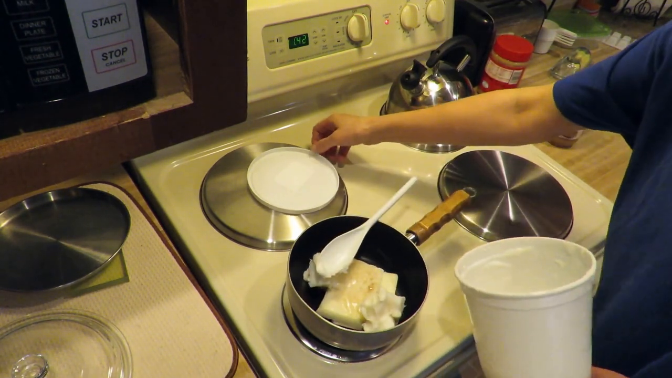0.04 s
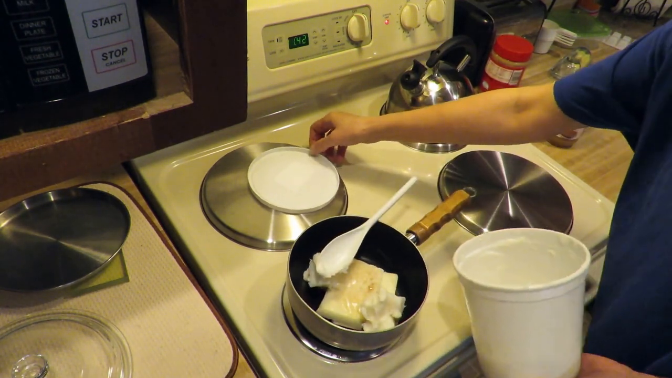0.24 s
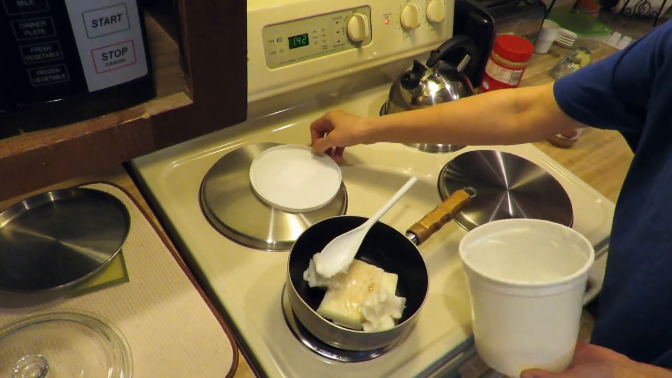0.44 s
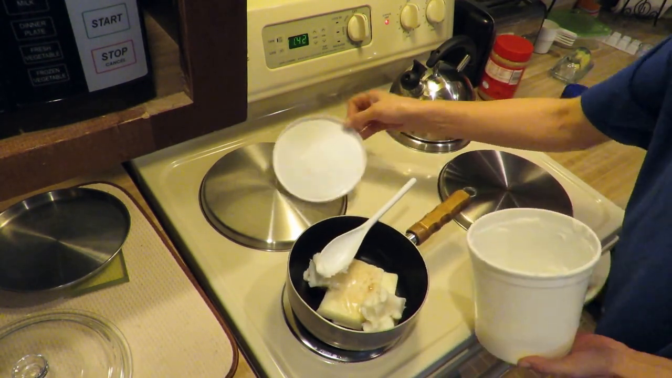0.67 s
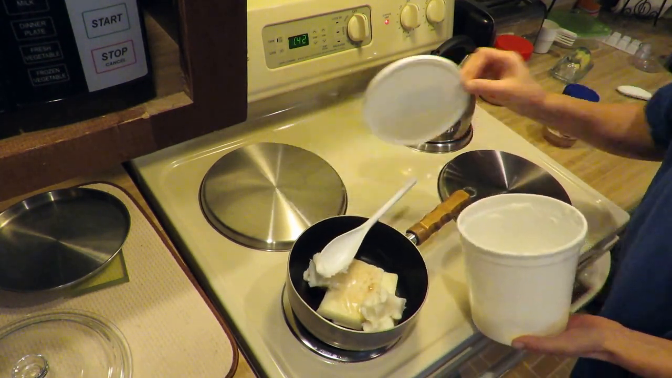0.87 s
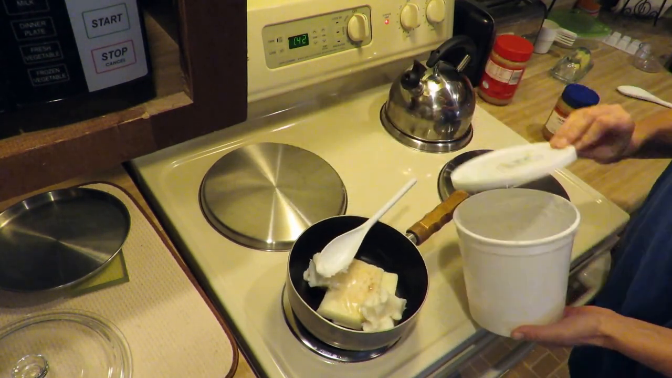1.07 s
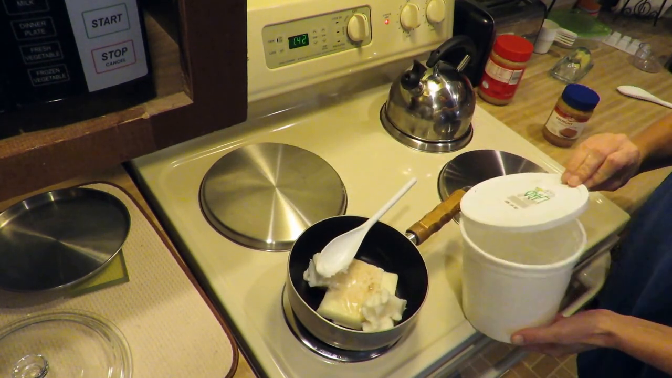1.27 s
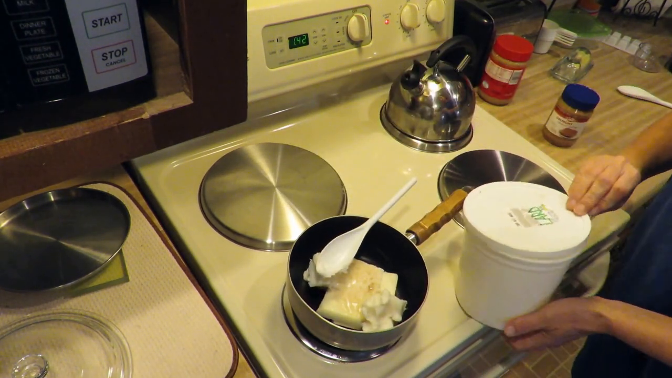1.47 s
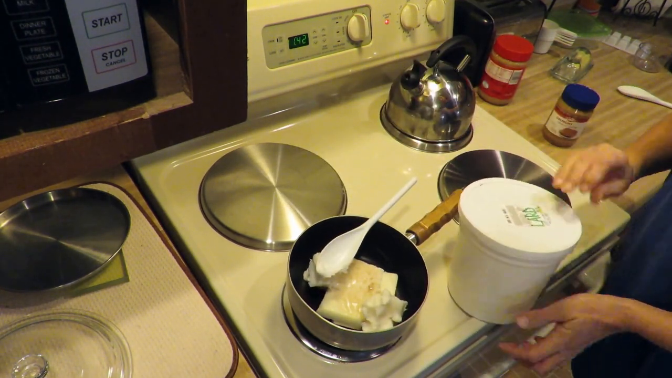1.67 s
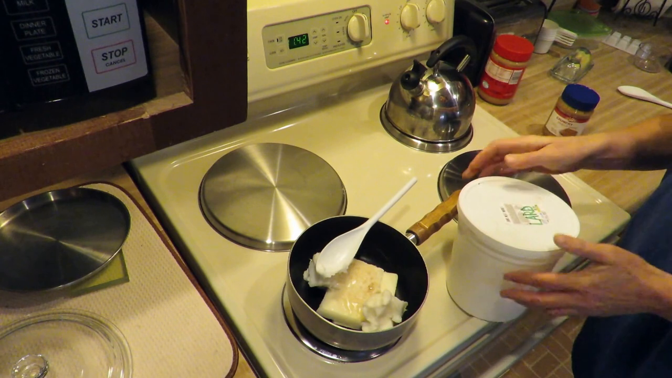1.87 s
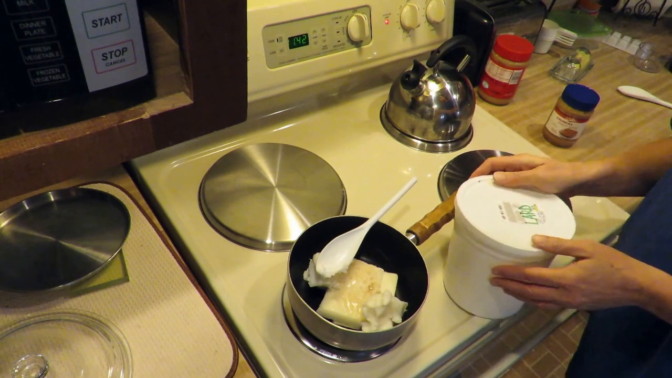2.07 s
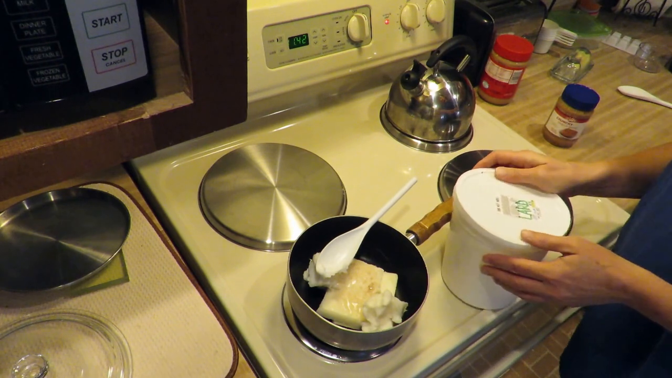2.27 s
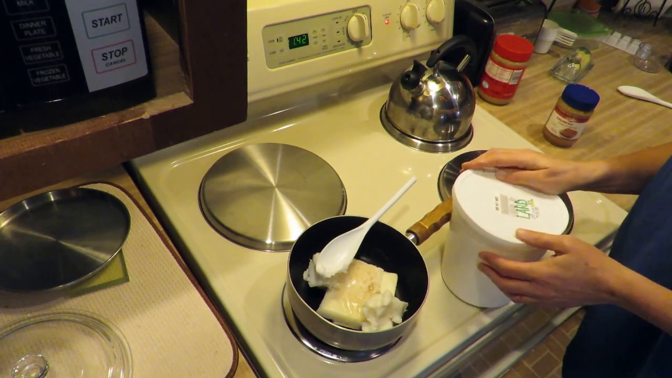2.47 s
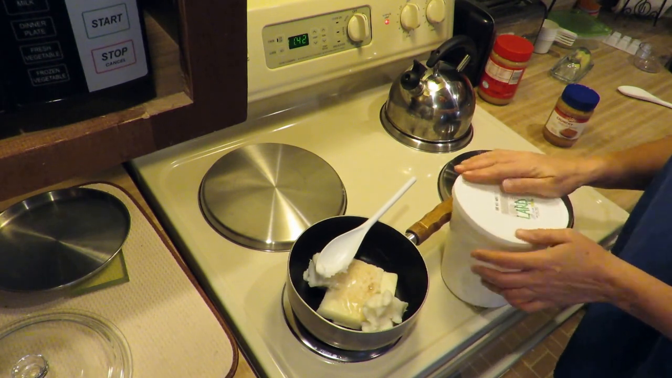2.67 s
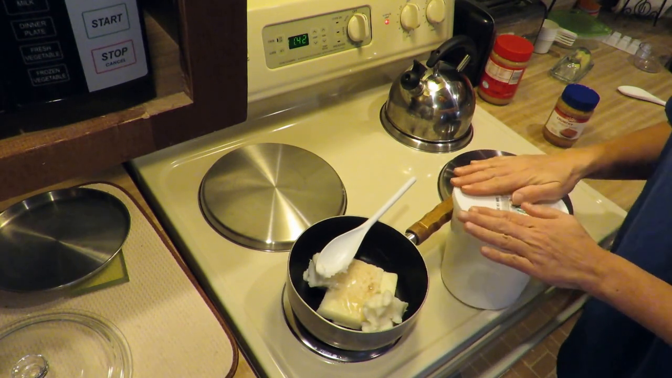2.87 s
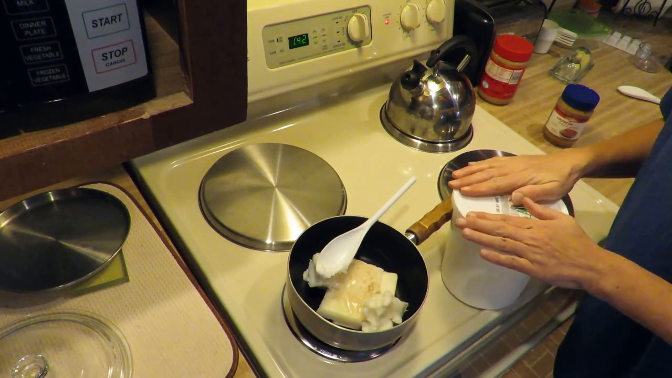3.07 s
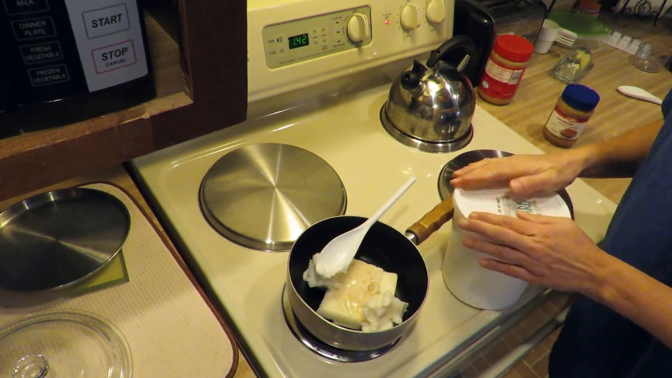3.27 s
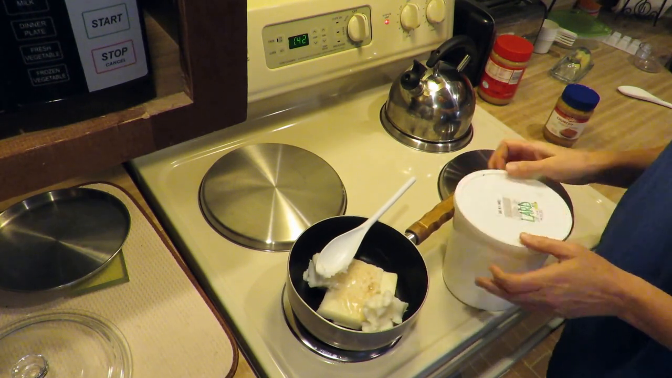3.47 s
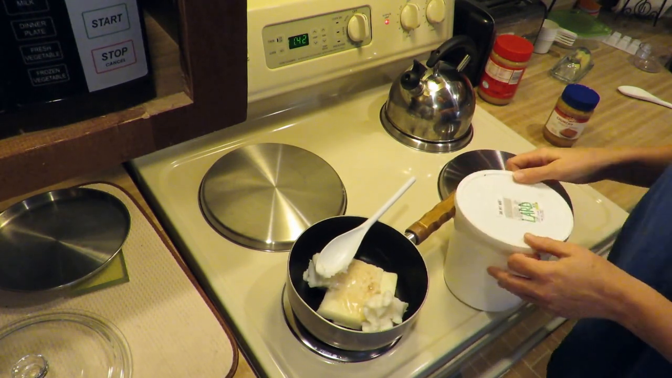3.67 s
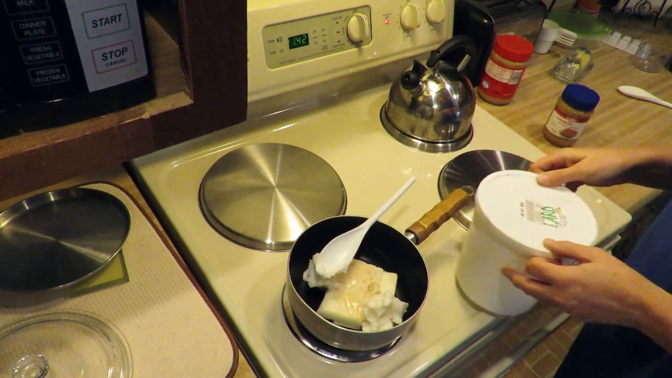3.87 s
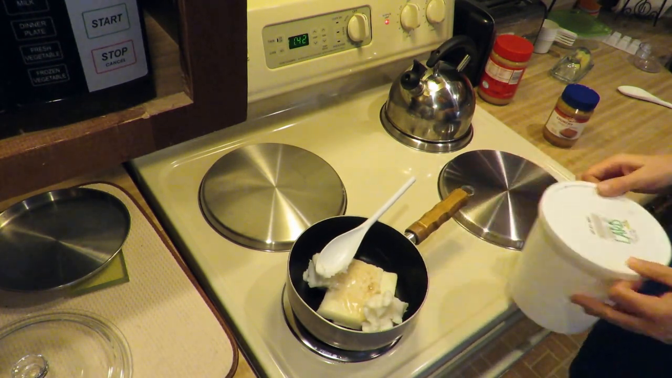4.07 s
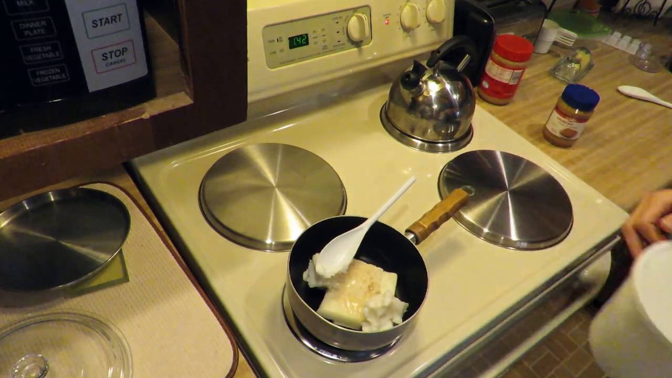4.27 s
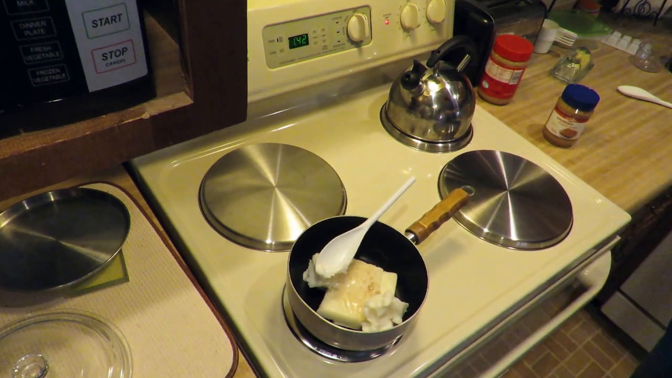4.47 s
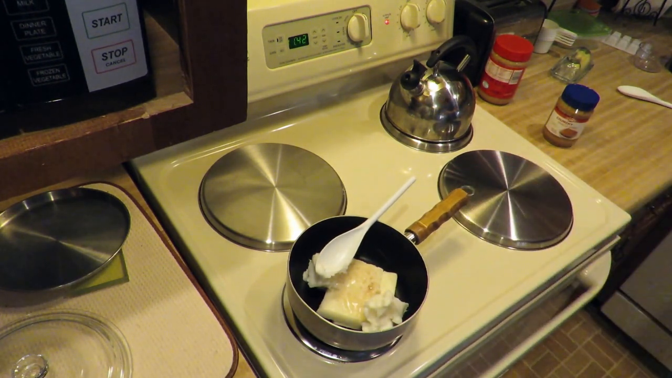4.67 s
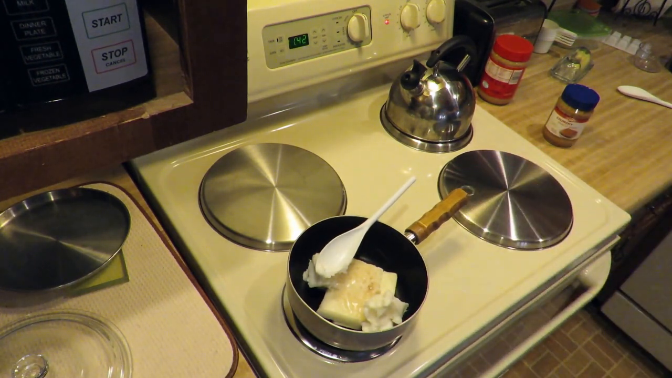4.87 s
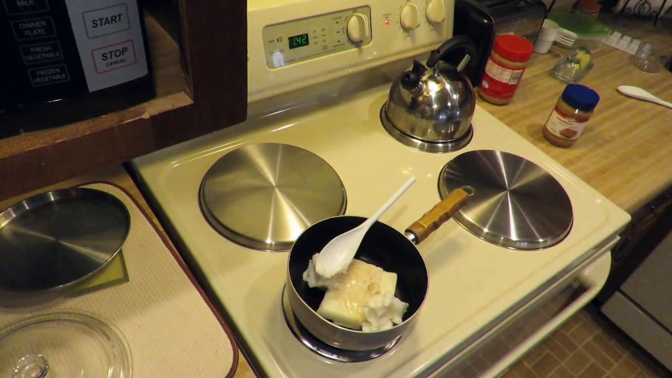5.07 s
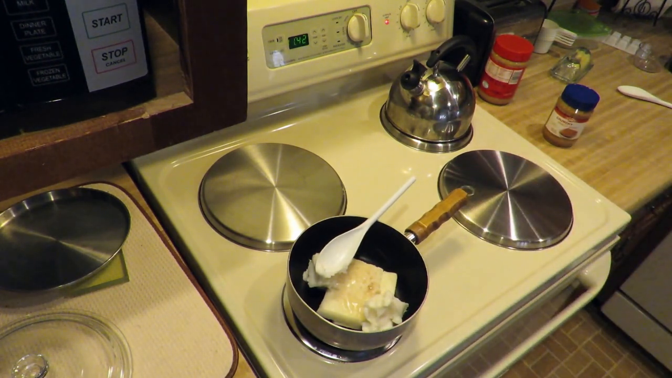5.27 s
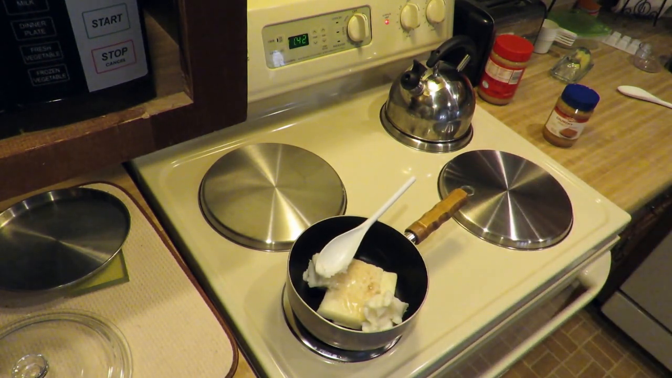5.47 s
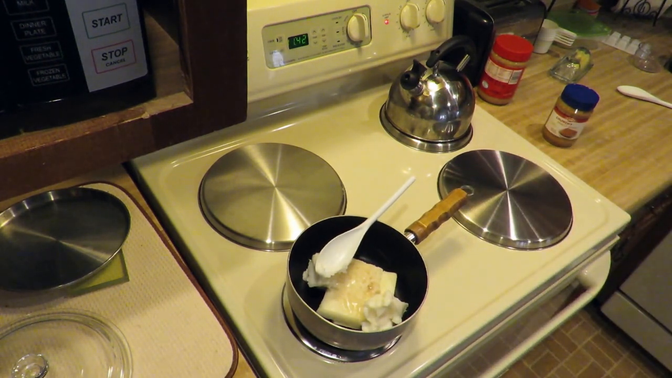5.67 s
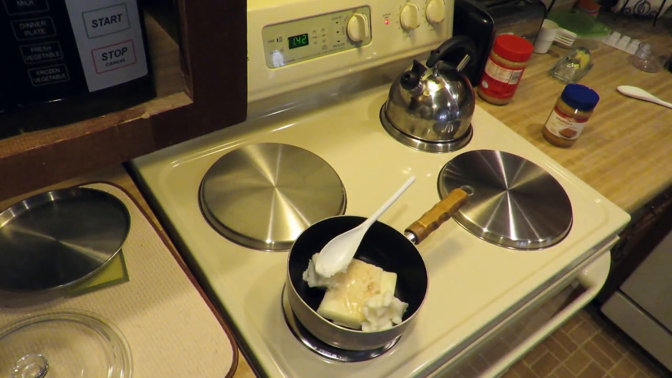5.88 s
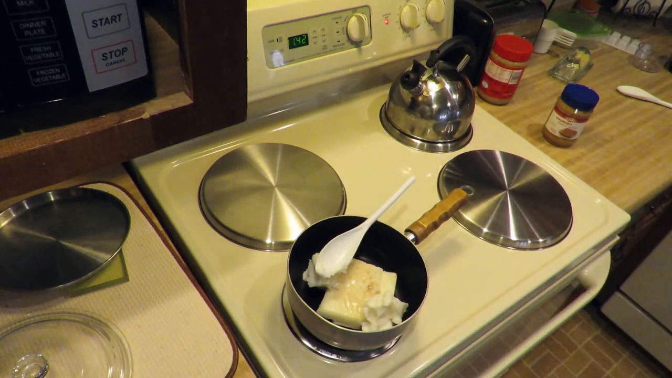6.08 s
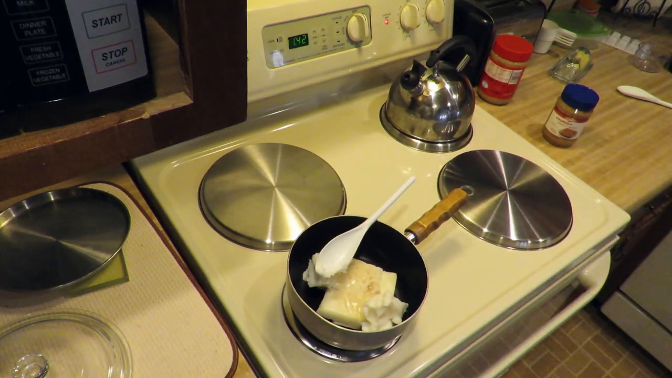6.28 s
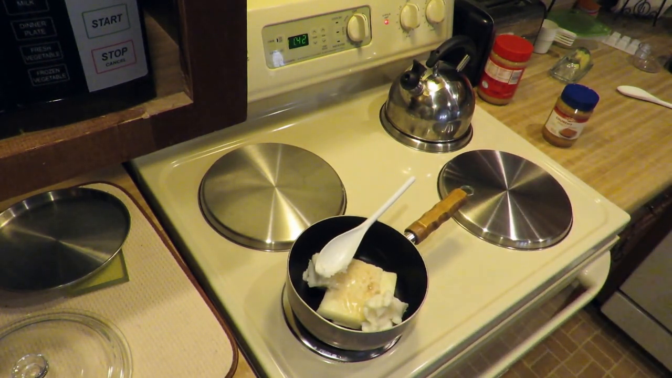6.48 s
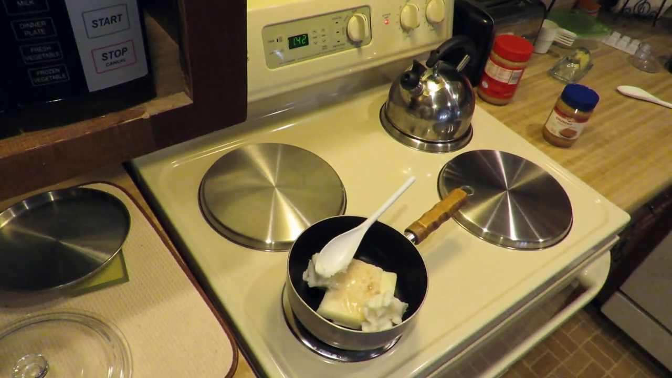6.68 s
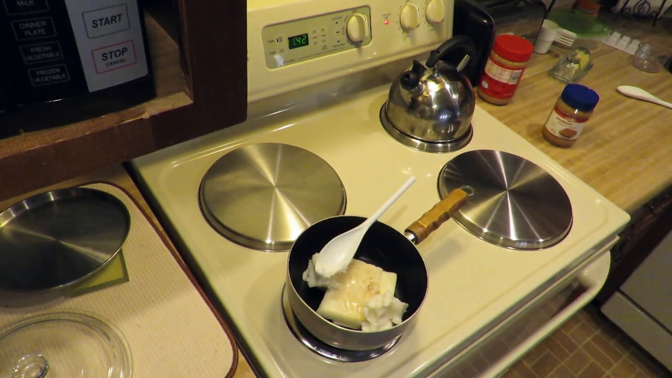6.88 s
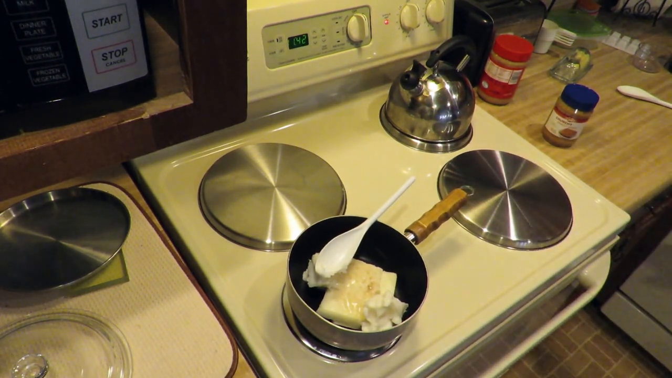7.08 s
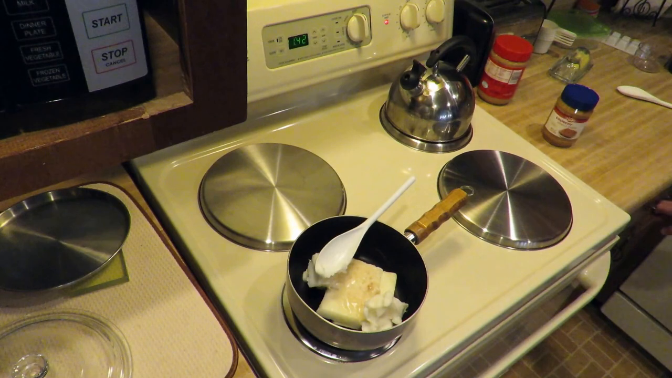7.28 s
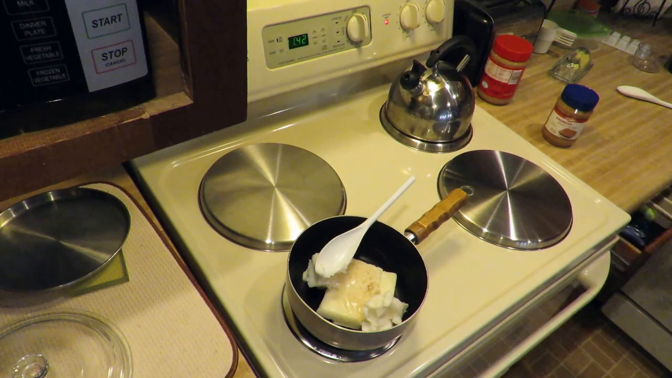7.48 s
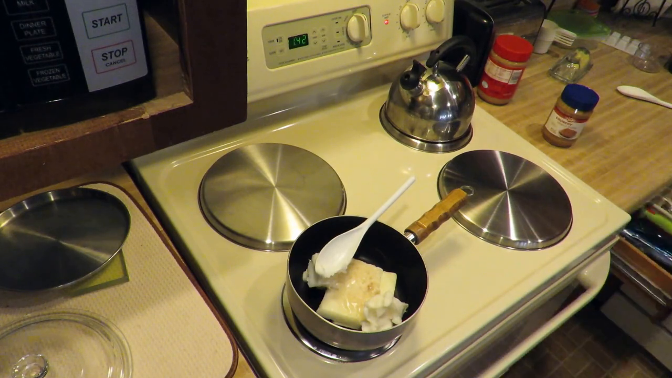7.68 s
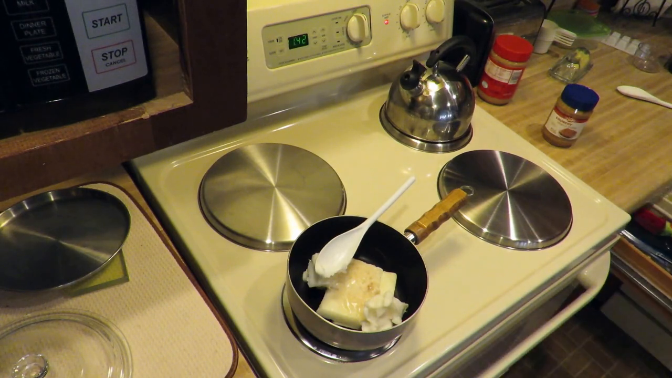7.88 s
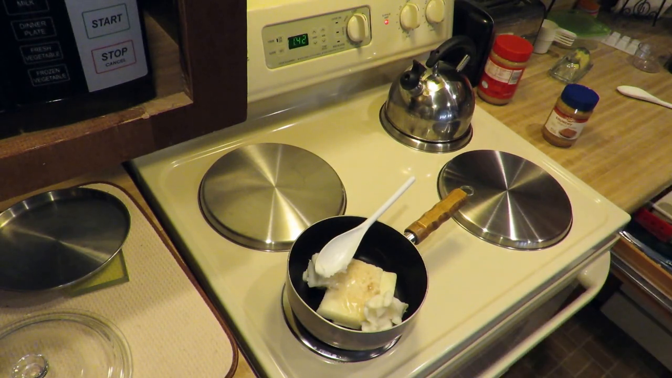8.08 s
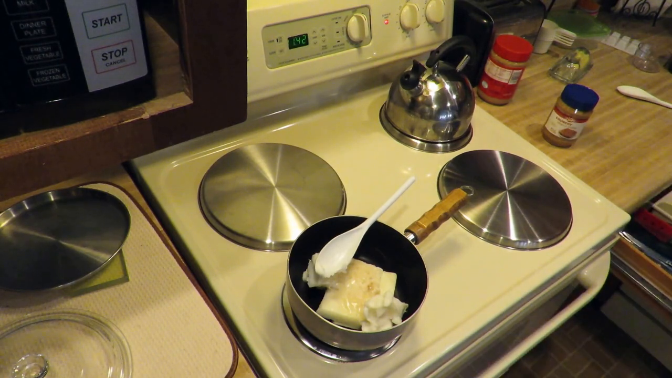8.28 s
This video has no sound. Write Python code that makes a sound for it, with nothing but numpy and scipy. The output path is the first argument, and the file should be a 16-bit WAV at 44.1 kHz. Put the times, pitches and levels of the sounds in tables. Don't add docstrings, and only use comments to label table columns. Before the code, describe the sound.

A stereo camera microphone near a stove hears a soft lid rattle with a faint steely ring, then a sharp, hollow plastic clatter on a tub rim. Muffled presses and small snaps close it. A brush and a hard double click come next, a pause, a heavy hollow set-down with wobbling, a barely audible step, and a drawer rumbling along runners, over steady hum and faint hiss.

```python
import sys
import numpy as np
from scipy import signal
from scipy.io import wavfile
from scipy.ndimage import uniform_filter1d

SR = 44100
rng = np.random.default_rng(int(sys.argv[2]) if len(sys.argv) > 2 else 0)


def waveform_to_disk(signal):
    frames = np.transpose(np.atleast_2d(signal))
    scaled = np.clip(frames, -1, 1) * 32767
    samples = np.round(scaled).astype(np.int16)
    wavfile.write(sys.argv[1], SR, samples)


def linear_from_db(decibels):
    return 10 ** (np.asarray(decibels, float) / 20)


N = 367830

# (time [s], wall peak [dB], flatness [dB], contact length [ms])
LIFT_BLOWS = [(0.195, -40, -6, 13), (0.384, -54.5, 0, 16), (0.408, -41, -9, 12), (0.505, -45, -4, 10),
              (0.531, -36, -7, 13), (0.553, -36, 9, 13), (0.573, -27, -2.5, 12), (0.593, -28, -5, 11),
              (0.63, -35, -2, 16), (0.694, -41.5, 9, 26), (0.769, -36.5, -14, 14)]
# (hollow [dB], hollow gain [dB/dB flatness], edge [dB], edge loss [dB/dB flatness], rise [ms])
LIFT_TOUCH = (0, 1.36, -19.5, 0.89, 1.5)
# (time [s], pressure [dB])
LIFT_RUB = [
    (0.36, -56),
    (0.424, -45),
    (0.47, -56),
    (0.574, -37.5),
    (0.668, -47),
    (0.766, -46.5),
    (1.0, -63),
]
# (hollow [dB], edge [dB])
LIFT_GRIP = (-2.5, -12)
# (frequency [Hz], width [Hz], level [dB])
LID_BODY = ([(35, -23), (60, 8), (171, -14), (272, -4.5), (521, -4), (1120, -6.5), (4730, -18),
             (13200, -32), (15500, -40)], [(288, 23, -1.5), (1130, 140, -9), (1510, 100, -10),
             (2230, 50, -10.5), (3030, 64, -13.5), (3450, 110, -20.5)])


def lid_lift():
    blows = strike(LID_BODY, contacts(LIFT_BLOWS, LIFT_TOUCH))
    return blows + rub(LID_BODY, stroke(LIFT_RUB, LIFT_GRIP), slips_per_s=3000, spread_db=1.4, flicker_db=1.7)


# (time [s], wall peak [dB], flatness [dB], contact length [ms])
DROP_BLOWS = [(1.265, -23, 33, 10), (1.316, -11, -5, 6), (1.326, -4.5, -5.5, 12), (1.344, -8.5, -10.5, 13),
              (1.37, -15, -5, 11), (1.406, -17, -9, 8.7), (1.443, -13, -4, 15), (1.466, -21.5, 7, 25),
              (1.487, -16, -3, 5.6), (1.524, -16.5, 3, 9.2), (1.532, -19.5, 0, 8.6), (1.55, -24.5, 0, 10.7),
              (1.569, -19.5, -2, 5.5), (1.647, -21, 0, 14), (1.66, -16, 1, 18), (1.674, -19, 6, 9.5),
              (1.7, -27, -5, 8.1)]
# (hollow [dB], hollow gain [dB/dB flatness], edge [dB], edge loss [dB/dB flatness], rise [ms])
DROP_TOUCH = (-0.5, 0.02, -16.5, 1.06, 2)
# (time [s], pressure [dB])
DROP_RUB = [
    (1.31, -21),
    (1.356, -29),
    (1.438, -29.5),
    (1.49, -30.5),
    (1.57, -42),
    (1.736, -53),
    (1.8, -45),
]
# (hollow [dB], edge [dB])
DROP_GRIP = (2, -17)
# (frequency [Hz], width [Hz], level [dB])
TUB_BODY = ([(60, -16), (150, -8), (260, 0), (420, -1), (620, 0), (1830, -7), (3400, -10), (6000, -22),
            (12300, -33), (15500, -48)], [(264, 110, -2), (425, 40, -4), (1110, 80, -7), (1530, 76, -8),
            (1790, 60, -5), (2330, 60, -13), (2900, 140, -14)])


def lid_drop():
    blows = strike(TUB_BODY, contacts(DROP_BLOWS, DROP_TOUCH))
    return blows + rub(TUB_BODY, stroke(DROP_RUB, DROP_GRIP), slips_per_s=4500, spread_db=1.5, flicker_db=3.6)


# (time [s], wall peak [dB], flatness [dB], contact length [ms])
PRESS_BLOWS = [(2.111, -39, -1, 8.5), (2.134, -60, 2, 5), (2.199, -38.5, 12, 12), (2.208, -35.5, 5.5, 6.1),
               (2.217, -27, 0.5, 7), (2.233, -50, 14, 3.3), (2.3, -26, 4.5, 10), (2.43, -41, -5, 6.2),
               (2.48, -22, -2.5, 4.6), (2.51, -42, -6, 8.5), (2.708, -41.5, 10, 13), (2.735, -44, -7, 14),
               (2.777, -38, 0, 15), (2.821, -41, -1, 3.8), (2.902, -33, -7, 2.1), (2.97, -36.5, 6.5, 6.4),
               (2.986, -29.5, 4.5, 6.1), (3.002, -30, 4.5, 3.6), (3.027, -25, -4, 3.7),
               (3.038, -33, -11, 4), (3.061, -43, -6, 4), (3.067, -21.5, -11, 3.2), (3.074, -19, -5, 4.4),
               (3.098, -43, 1, 4.2), (3.448, -30, -7, 4.1), (3.471, -38.5, 13, 5.2), (3.633, -42, -26, 7.1),
               (3.729, -40.5, -16, 7.2)]
# (hollow [dB], hollow gain [dB/dB flatness], edge [dB], edge loss [dB/dB flatness], rise [ms])
PRESS_TOUCH = (1.2, 1.18, -17, 0.37, 2)
# (time [s], pressure [dB])
PRESS_RUB = [
    (1.95, -60),
    (2.096, -71.5),
    (2.302, -74),
    (2.47, -60),
    (2.752, -54),
    (2.964, -68),
    (3.068, -48),
    (3.188, -70),
    (3.9, -67),
]
# (hollow [dB], edge [dB])
PRESS_GRIP = (4.9, -15)
# (frequency [Hz], width [Hz], level [dB])
SEALED_BODY = ([(60, -34), (150, -29), (253, 2), (359, -17), (810, -13.5), (1830, -7.5), (4500, -20),
                (10900, -32), (13500, -36), (15500, -80)], [(266, 62, 3), (547, 360, -6.5),
                (1894, 160, -19), (2530, 83, -38), (2980, 100, -18.5)])


def lid_press():
    blows = strike(SEALED_BODY, contacts(PRESS_BLOWS, PRESS_TOUCH))
    return blows + rub(SEALED_BODY, stroke(PRESS_RUB, PRESS_GRIP), slips_per_s=3500, spread_db=2.3, flicker_db=2.5)


# (time [s], pressure [dB])
BRUSH_RUB = [
    (3.38, -66),
    (3.44, -47.5),
    (3.5, -82),
    (4.1, -73),
    (4.24, -50),
    (4.29, -39),
]
# (hollow [dB], edge [dB])
BRUSH_GRIP = (0, -12.5)


def lid_brush():
    return rub(LID_BODY, stroke(BRUSH_RUB, BRUSH_GRIP), slips_per_s=3600, spread_db=1.6, flicker_db=2.1)


# (time [s], peak [dB], frequency [Hz], t60 [s])
THUMPS = [(0.548, -26.5, 143, 0.075), (1.321, -16, 240, .06), (1.65, -15, 266, 0.051),
          (1.662, -21, 280, 0.045), (1.69, -23, 170, 0.083), (2.11, -31, 248, 0.094), (2.199, -26, 259, .1),
          (2.212, -18, 235, 0.067), (2.234, -22.5, 228, .05), (2.307, -18, 266, 0.097),
          (2.48, -24.5, 501, 0.041), (2.712, -42, 254, 0.099), (2.986, -31, 255, 0.051),
          (3.001, -23.5, 253, 0.048), (3.018, -34, 240, 0.053), (3.068, -22.5, 302, 0.05),
          (3.075, -21.5, 310, 0.048), (3.095, -25, 250, 0.061), (3.471, -24, 256.6, 0.069),
          (4.293, -24, 290, 0.093), (5.852, -1, 283.7, 0.066), (5.863, 1.5, 357, 0.055),
          (5.873, -3.5, 378, 0.058), (5.937, -12, 220, 0.063), (5.971, -12, 301, 0.055),
          (5.994, -15, 332, 0.065), (6.042, -23, 188, .08), (6.735, -33, 200, 0.07),
          (6.754, -32.5, 183, 0.088), (7.84, -24, 290, .07)]


def air_thumps():
    out = np.zeros(N)
    t = np.arange(SR // 2) / SR
    for s, db, hz, t60 in THUMPS:
        turns = hz * t * (1 + 0.032 * np.exp(-t / 0.0034))
        swell = 1 - np.exp(-hz * t * 10)
        add(out, s, linear_from_db(db - 2.5 - 60 * t / t60) * swell * np.sin(2 * np.pi * turns))
    return out


# (time [s], frequency [Hz], peak [dB], length [ms])
STEEL_RINGS = [(.41, 2040, -45, 28), (0.41, 5600, -69, 61), (0.53, 4500, -59, 58), (.6, 9600, -70, 49),
               (.62, 4700, -59.5, 69), (.62, 9050, -70, 70), (0.74, 8000, -75, 110), (.78, 11400, -78, 110)]
# (time [s], frequency [Hz], peak [dB], length [ms])
DULL_RINGS = [(1.264, 496, -23.5, 10), (1.265, 1980, -33, 8.7), (1.266, 1520, -30, 10.5),
              (1.267, 2900, -42, 12), (1.325, 3110, -25.5, 20), (1.352, 1780, -23, 24),
              (1.405, 1780, -29, 18), (1.44, 1780, -31, 14), (1.46, 468, -27, 30), (1.525, 1800, -32.5, 15),
              (1.54, 605, -25, 22), (1.655, 2970, -50, 25), (2.301, 2980, -46.5, 11),
              (2.483, 2570, -38.5, 9), (3.028, 1800, -37.5, 8.6), (3.029, 2900, -42, 10),
              (3.07, 4850, -48, 12), (3.072, 3740, -43.5, 11), (3.41, 1920, -49, 35),
              (3.47, 530, -33, 11.4), (4.296, 746, -22, 20), (7.46, 4000, -40.5, 31),
              (7.47, 266, -36.5, 59), (7.48, 4350, -41, 45), (7.59, 1880, -34, 37), (7.66, 5400, -44.5, 49),
              (7.72, 1750, -35, 23), (7.74, 307, -34, 55), (7.805, 3150, -40, 15), (7.81, 720, -35, 22),
              (7.815, 9100, -37.5, 16), (7.86, 6100, -38, 21), (7.868, 580, -21.5, 15),
              (7.88, 3750, -37, 22), (7.905, 4410, -41, 30)]
STEEL_WIDTH_HZ, DULL_WIDTH_SHARE = 37, 0.12


def scrape_rings():
    out = np.zeros(N)
    t = np.arange(SR // 4) / SR
    rows = [(*row, STEEL_WIDTH_HZ) for row in STEEL_RINGS]
    rows += [(*row, DULL_WIDTH_SHARE * row[1]) for row in DULL_RINGS]
    for s, hz, db, ms, width_hz in rows:
        noise = rng.standard_normal(len(t))
        tone = evened(tuned(tuned(noise, hz, width_hz), hz, width_hz))
        u = t * 1000 / ms
        add(out, s, linear_from_db(db) * tone * 4.87 * u * np.exp(-2 * u ** 2))
    return out


# (time [s], wall peak [dB], flatness [dB], contact length [ms])
KNOCKS = [
    (4.282, -28, -6, 8.7),
    (4.2925, -3, 9, 0.25),
    (4.2955, -2.5, 7, 0.24),
    (4.3, -12.5, -2, 0.79),
    (4.296, -12.5, -6.5, 14),
    (4.906, -51, -26, 8.1),
]
# (hollow [dB], hollow gain [dB/dB flatness], edge [dB], edge loss [dB/dB flatness], rise [ms])
KNOCK_TOUCH = (-12, 0.45, -15.5, 1.177, 1.5)
# (frequency [Hz], width [Hz], level [dB])
EDGE_BODY = ([(60, -30), (145, -28), (250, -6), (550, -5), (1000, -2), (1750, -2), (2500, -10), (3600, -16),
             (5500, -27), (9000, -36), (12000, -44), (15500, -70)], [(400, 80, -5), (711, 90, 0),
             (1050, 200, -4), (1360, 120, -5), (1730, 140, -7), (2100, 70, -10), (2530, 90, -11),
             (2890, 90, -14)])


def edge_knock():
    return strike(EDGE_BODY, contacts(KNOCKS, KNOCK_TOUCH))


# (time [s], wall peak [dB], flatness [dB], contact length [ms])
SET_BLOWS = [(5.839, -33, -10, 8), (5.85, -10, -3, 3.8), (5.856, -6, -6, 2.75), (5.863, -18.5, 10.5, 4.3),
             (5.873, -12, -1, 8), (5.89, -20.5, -7, 9), (5.908, -20.5, -8, 12), (5.936, -20.5, 7, 10.3),
             (5.972, -25.5, 4.5, 10), (5.994, -34, 14, 7.8), (6.04, -43, 16, 10.7)]
# (hollow [dB], hollow gain [dB/dB flatness], edge [dB], edge loss [dB/dB flatness], rise [ms])
SET_TOUCH = (1.5, 1, -16.5, -0.3, 1.5)
# (frequency [Hz], width [Hz], level [dB])
SHELF_BODY = ([(30, -20), (60, -4), (140, 2), (200, -5), (370, -4.5), (700, -7), (1200, -12), (1700, -18.5),
              (3000, -25.5), (11900, -48), (15500, -92)], [(207, 52, 3), (357, 52, -6), (562, 85, -4),
              (840, 44, -10.5), (1130, 93, -12.5), (1520, 110, -20.5), (2570, 57, -40)])


def set_down():
    return strike(SHELF_BODY, contacts(SET_BLOWS, SET_TOUCH))


# (time [s], wall peak [dB], flatness [dB], contact length [ms])
STEPS = [
    (6.728, -55.5, 14, 23),
    (6.777, -53.5, 7.6, 40),
]
# (frequency [Hz], width [Hz], level [dB])
FLOOR_BODY = ([(24, -56), (40, -48), (174, 5), (417, -30), (535, -12), (6470, -60), (15500, -54)],
               [(183, 31, -6), (554, 23.7, -17), (796, 75, -16)])


def footstep():
    return strike(FLOOR_BODY, contacts(STEPS, SET_TOUCH))


# (time [s], wall peak [dB], flatness [dB], contact length [ms])
DRAWER_BLOWS = [(7.462, -32, -8, 37), (7.562, -37, 0, 10), (7.584, -29, 5, 12), (7.617, -27, 5, 14.8),
                (7.654, -24.5, 6, 14), (7.672, -24, 6, 13), (7.7, -25, -2, 6.1), (7.72, -27, 2, 17),
                (7.797, -28.5, 0, 8.8), (7.812, -20.5, 1, 16), (7.848, -22.5, -6, 11),
                (7.868, -24, -2, 11.4), (7.905, -22.5, -7, 13), (7.987, -29, 18, 4.5),
                (8.04, -28, -3, 10.5), (8.065, -36, -7, 8.4), (8.121, -37, -6, 11.3), (8.208, -36, -7, 7.9)]
# (hollow [dB], hollow gain [dB/dB flatness], edge [dB], edge loss [dB/dB flatness], rise [ms])
DRAWER_TOUCH = (-13, 0.02, -15, 2.15, 3)
# (frequency [Hz], width [Hz], level [dB])
DRAWER_BODY = ([(35, -46), (60, -2.5), (192, -11), (298, -3.5), (403, -2.5), (571, 0), (953, -8.5),
                (1830, -12.5), (2300, -12), (13500, -6), (15500, -31)], [(289, 26, 2.5), (580, 59, -16),
                (1240, 55, -9)])
# (time [s], runner load [dB], sliding hiss [dB])
TRAVEL = [(7.4, -53, -73), (7.486, -38, -35), (7.56, -37.5, -40), (7.66, -34, -41), (7.74, -38.5, -46),
          (7.79, -40.5, -45), (7.82, -35, -39), (7.86, -36.5, -34), (7.96, -42, -49), (8.142, -53.5, -56.5),
          (8.25, -60, -88)]
DRAWER_HOLLOW_DB = -4.5


def drawer():
    slide = [(s, load, load + DRAWER_HOLLOW_DB, hiss) for s, load, hiss in TRAVEL]
    blows = strike(DRAWER_BODY, contacts(DRAWER_BLOWS, DRAWER_TOUCH))
    slip = rub(DRAWER_BODY, slide, slips_per_s=7000, spread_db=3.66, flicker_db=2.45)
    return blows + slip + panel_swell()


PANEL_HZ, PANEL_DB, PANEL_FOLLOW = 1645, -30.5, 2.26
CATCH_S, CATCH_WIDTH_S, CATCH_SAG_HZ = 7.82, 0.13, 170


def panel_swell():
    s, load_db, _ = np.transpose(TRAVEL)
    t = np.arange(s[0], s[-1], 1 / SR)
    centre_hz = PANEL_HZ - CATCH_SAG_HZ * np.exp(-((t - CATCH_S) / CATCH_WIDTH_S) ** 2)
    flicker = evened(uniform_filter1d(rng.standard_normal(len(t)), 300))
    noise = rng.standard_normal(len(t)) * linear_from_db(2.8 * flicker)
    lower_hz = 0.72 * centre_hz
    upper = evened(resonate(resonate(noise, centre_hz, 550), centre_hz, 550))
    lower = evened(resonate(resonate(noise, lower_hz, 590), lower_hz, 590))
    db = PANEL_DB + PANEL_FOLLOW * (np.interp(t, s, load_db) - load_db.max())
    out = np.zeros(N)
    add(out, s[0], linear_from_db(db - 3) * (upper + 0.86 * lower) * signal.windows.tukey(len(t), 0.2))
    return out


RISE_SHARE = 0.45


def contacts(blows, touch):
    hollow_db, fill, edge_db, dull, rise_ms = touch
    rows = []
    for s, db, flat, ms in blows:
        hollow = db + hollow_db + fill * flat
        edge = db + edge_db - dull * flat
        rows.append((s, db, hollow, edge, ms, min(rise_ms, RISE_SHARE * ms)))
    return rows


def stroke(curve, grip):
    hollow_db, edge_db = grip
    return [(s, db, db + hollow_db, db + edge_db) for s, db in curve]


def strike(body, blows):
    out = np.zeros(N)
    taps = responses(body)
    t_ms = np.arange(3500) * 1000 / SR
    rough, grit = rng.standard_normal((2, len(blows), 3, len(t_ms)))
    grit = uniform_filter1d(uniform_filter1d(grit, 90), 90)
    rough = rough * linear_from_db(2.8 * evened(grit))
    for (s, *dbs, length_ms, rise_ms), noise in zip(blows, rough):
        rises_ms = rise_ms * np.array([[1.4], [1], [2.2]])
        force = noise * (1 - np.exp(-(t_ms / rises_ms) ** 2)) * np.exp(-t_ms / length_ms)
        force[:, 0] = 1.1 * np.exp(-rise_ms)
        parts = signal.fftconvolve(taps, force, axes=1)
        parts /= abs(parts).max(1, keepdims=True)
        add(out, s, linear_from_db(dbs) @ parts)
    return out


def rub(body, rows, slips_per_s, spread_db, flicker_db):
    s, *dbs = np.transpose(rows)
    t = np.arange(s[0], s[-1], 1 / SR)
    when, size, sign, grip = rng.random((4, len(t)))
    grip = evened(uniform_filter1d(uniform_filter1d(grip - 0.5, 500), 500))
    slip_db = flicker_db * grip - spread_db * np.log(size + 0.0058)
    slips = (when < slips_per_s / SR) * linear_from_db(slip_db) * np.sign(sign - 0.5)
    parts = signal.fftconvolve(responses(body), evened(slips)[None], axes=1)[:, :len(t)]
    moved = sum(linear_from_db(np.interp(t, s, db)) * part for db, part in zip(dbs, parts))
    out = np.zeros(N)
    add(out, s[0], moved * signal.windows.tukey(len(t), 0.1))
    return out


def responses(body, size=8192):
    colour, peaks = body
    hz = abs(np.fft.fftfreq(size, 1 / SR))
    power = linear_from_db(read(colour, hz) - 4) ** 2
    for peak_hz, width_hz, db in peaks:
        power = power + linear_from_db(db) ** 2 / (1 + (2 * (hz - peak_hz) / width_hz) ** 2) ** 1.14
    low = 1 / (1 + (hz / 650) ** 6)
    high = 1 / (1 + (4250 / (hz + 1)) ** 8)
    shares = np.array([(1 - low) * (1 - high), low, high])
    log_gain = 0.5 * np.log(power * shares + 1e-11)
    taps = np.fft.ifft(np.exp(np.conj(signal.hilbert(log_gain)))).real[:, :size // 2]
    return taps / np.linalg.norm(taps, axis=1, keepdims=True)


def resonate(x, hz, width_hz):
    turn = np.exp(2j * np.pi * np.cumsum(hz * np.ones(len(x))) / SR)
    r = np.exp(-np.pi * width_hz / SR)
    return 2 * (turn * signal.lfilter([1 - r], [1, -r], x / turn)).real


def tuned(x, hz, width_hz):
    return signal.lfilter(*signal.iirpeak(hz, hz / width_hz, SR), x)


def evened(x):
    return x / np.sqrt(np.mean(x ** 2) + 1e-20)


def read(points, hz):
    f, value = np.transpose(points)
    return np.interp(np.log(hz + 1), np.log(f + 1), value)


def add(mix, s, sound):
    part = mix[round(s * SR):][:len(sound)]
    part += sound[:len(part)]


# (frequency [Hz], t60 [s])
KITCHEN_T60 = [(100, 0.44), (300, 0.28), (1000, 0.36), (4000, 0.29), (12000, 0.19)]
# (frequency [Hz], side minus mid [dB])
ECHO_SIDE = [(60, -35), (150, -27), (380, -16), (950, -15.5), (2380, -16.5), (5980, -10.5), (15000, -0.5)]


def kitchen(x):
    taps = np.zeros((2, SR // 2))
    slots = np.arange(140, SR // 2 - 20, 20)[None]
    at = slots + rng.integers(0, 20, (2, slots.shape[1]))
    np.put_along_axis(taps, at, rng.choice([-1., 1.], at.shape), 1)
    hz, t, z = signal.stft(taps, SR, nperseg=256)
    z = z * linear_from_db(-60 * t / read(KITCHEN_T60, hz)[:, None])
    z[1] *= linear_from_db(read(ECHO_SIDE, hz) + 4.5)[:, None]
    tails = signal.istft(z, SR, nperseg=256)[1]
    tails = tails / np.linalg.norm(tails[0])
    mid, side = signal.oaconvolve(x[None], tails, axes=1)[:, :N]
    return np.array([mid + side, mid - side])


# (frequency [Hz], density [dB/Hz])
HUM_COLOUR = [(12, -51), (20, -13), (144, -0.5), (185, -11), (213, -1.5), (382, -11.5), (477, -8),
              (564, -11.5), (857, -9.5), (957, -16.5), (1720, -20.5), (1870, -23.5), (3350, -27.5),
              (13500, -47), (15500, -45)]
# (frequency [Hz], side minus mid [dB])
HUM_SIDE = [(60, -44), (150, -8), (380, 2.5), (950, -4), (2380, -0.5), (5980, -1.5), (15000, 2)]
HUM_DB = -46


def hum():
    frames, hz = N // 256 + 5, np.fft.rfftfreq(1024, 1 / SR)
    a, b, c, d, patches = rng.standard_normal((frames, 513, 5)).T
    patches = evened(uniform_filter1d(uniform_filter1d(patches, 10, 0), 16, 1))
    mid = a + 1j * b
    side = (c + 1j * d) * linear_from_db(read(HUM_SIDE, hz))[:, None]
    gain = linear_from_db(read(HUM_COLOUR, hz)[:, None] + 0.93 * patches)
    z = np.array([mid + side, mid - side]) * gain
    return linear_from_db(HUM_DB) * evened(signal.istft(z, nperseg=1024, noverlap=768)[1][:, :N])


# (frequency [Hz], width [Hz], level [dB])
HUM_BANDS = [(226.7, 16, -48), (136, 54, -52), (825, 16, -62.5), (1170, 58, -56), (6340, 6, -77)]


def drones():
    out = np.zeros(N)
    for hz, width_hz, db in HUM_BANDS:
        out += linear_from_db(db - 5) * evened(tuned(rng.standard_normal(N), hz, width_hz))
    return out


def scene():
    near = lid_lift() + lid_drop() + lid_press() + lid_brush()
    far = edge_knock() + set_down() + footstep() + drawer()
    drum, narrow = air_thumps(), scrape_rings()
    shaded = signal.lfilter(*signal.butter(1, 2600, fs=SR), far)
    echo = kitchen(linear_from_db(-5) * near + linear_from_db(-2) * far + linear_from_db(-2.5) * drum + linear_from_db(-10.5) * narrow)
    handled = linear_from_db(-0.5) * near + linear_from_db(5.5) * shaded + linear_from_db(2.5) * drum + narrow + echo
    thin = signal.butter(2, 75, "high", fs=SR)
    return signal.lfilter(*thin, handled) + hum() + drones()


def top_cut(x):
    return signal.sosfilt(signal.butter(12, 15630, fs=SR, output="sos"), x)


def record(dry):
    power_db = 10 * np.log10(abs(uniform_filter1d((dry ** 2).mean(0), 1800)) + 1e-12)
    recovery_db = np.arange(N) * 6.5 / SR
    wanted_db = np.maximum(power_db + 18, 0) * 0.53
    over_db = np.maximum(np.maximum.accumulate(wanted_db + recovery_db) - recovery_db, 0)
    ducked = dry / linear_from_db(uniform_filter1d(over_db, 300))
    low_pass = signal.firwin(255, 15250, fs=SR)[None]
    mix = signal.oaconvolve(ducked, low_pass, "same")
    return top_cut(mix)


dry = scene()
out = record(dry)
waveform_to_disk(out)
```